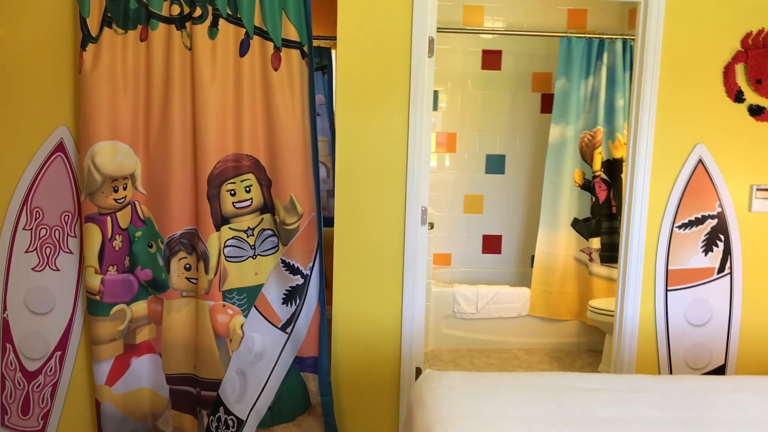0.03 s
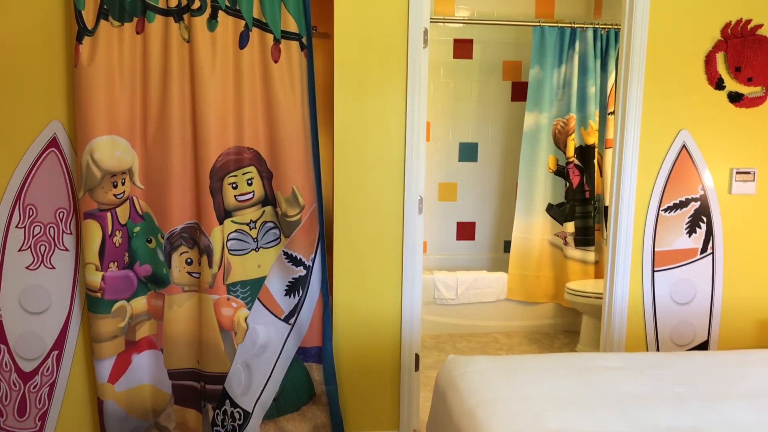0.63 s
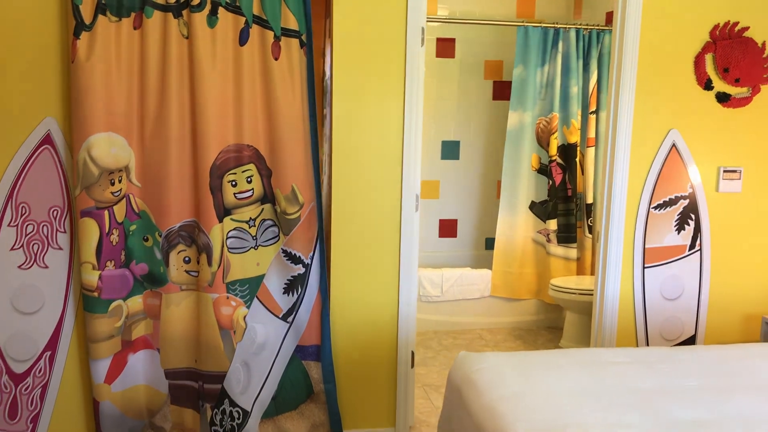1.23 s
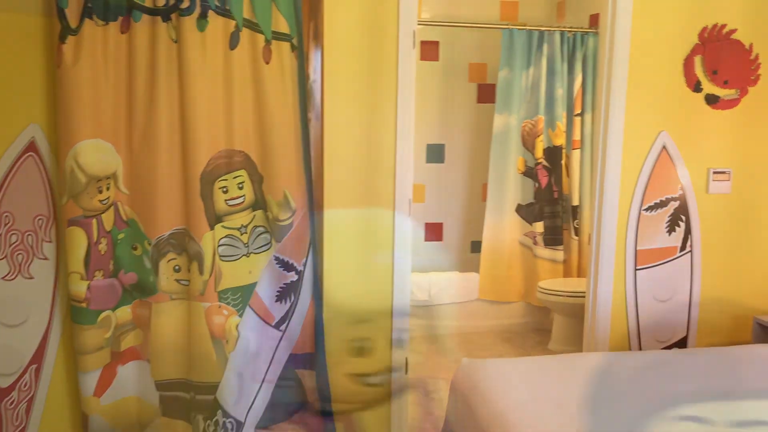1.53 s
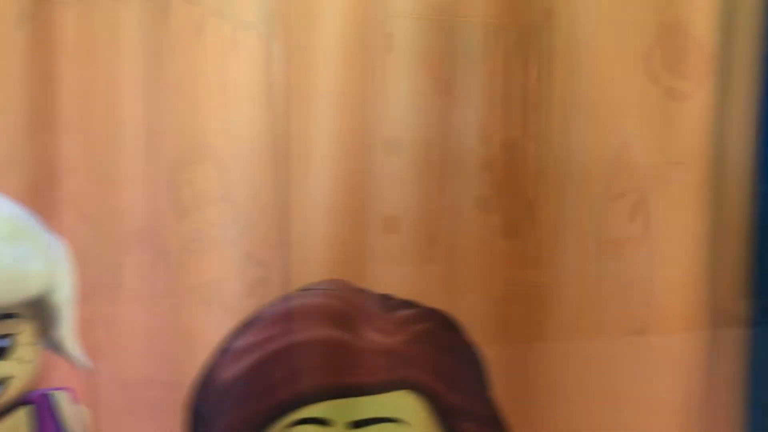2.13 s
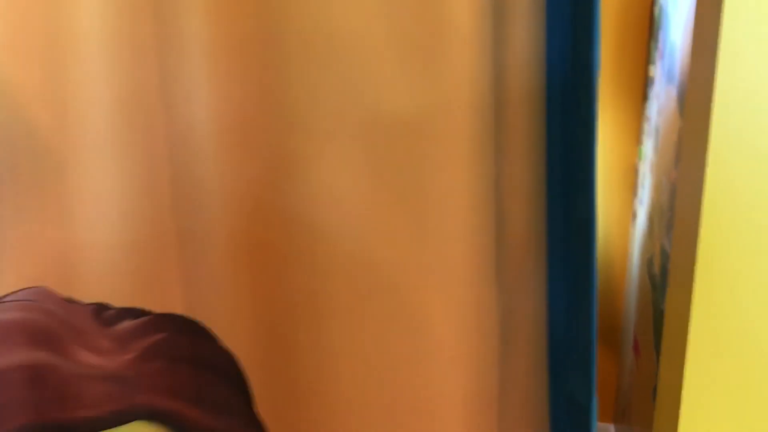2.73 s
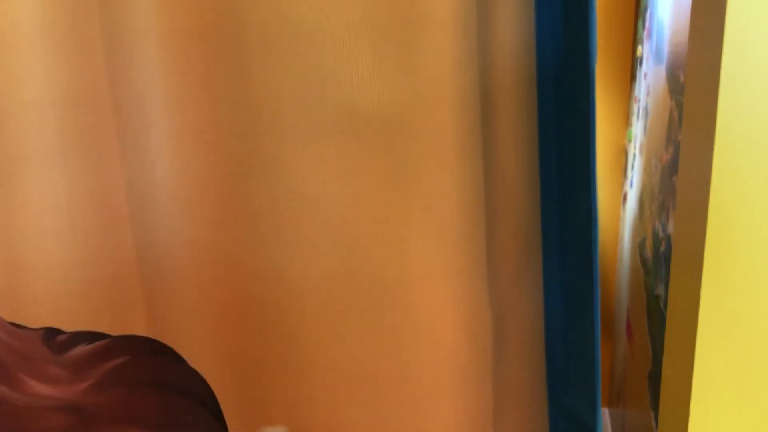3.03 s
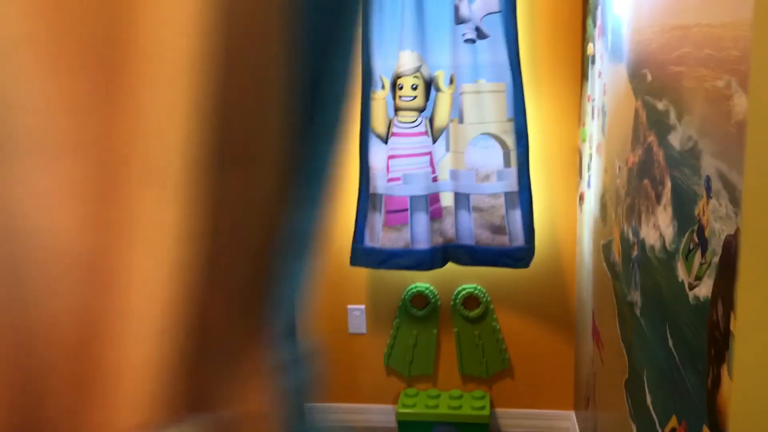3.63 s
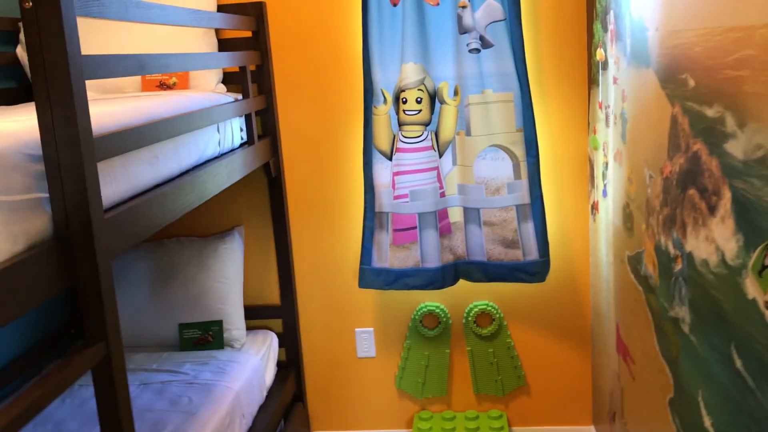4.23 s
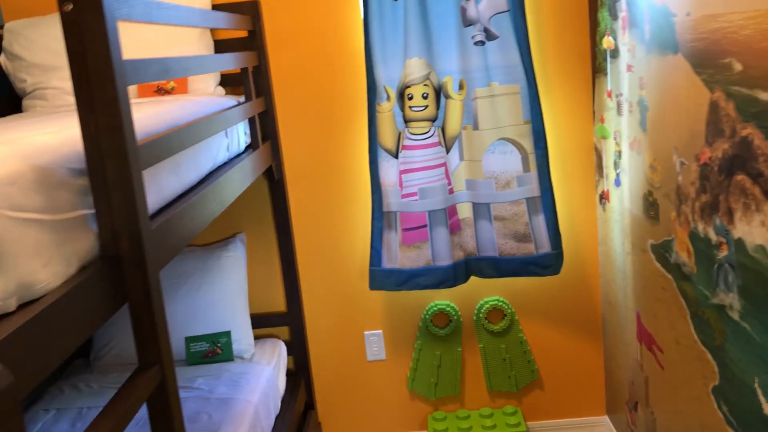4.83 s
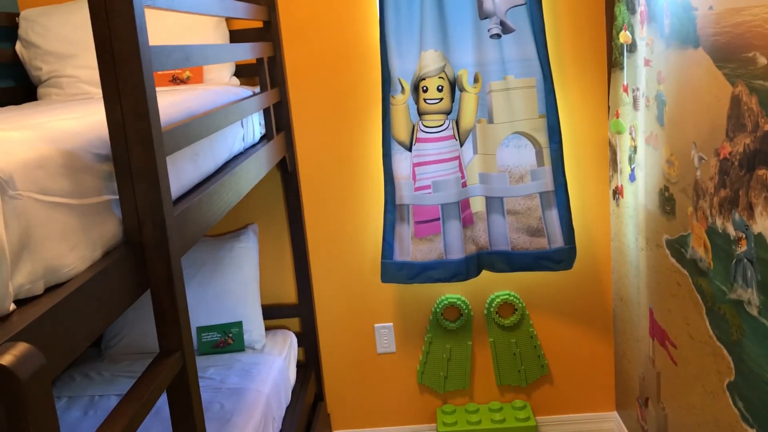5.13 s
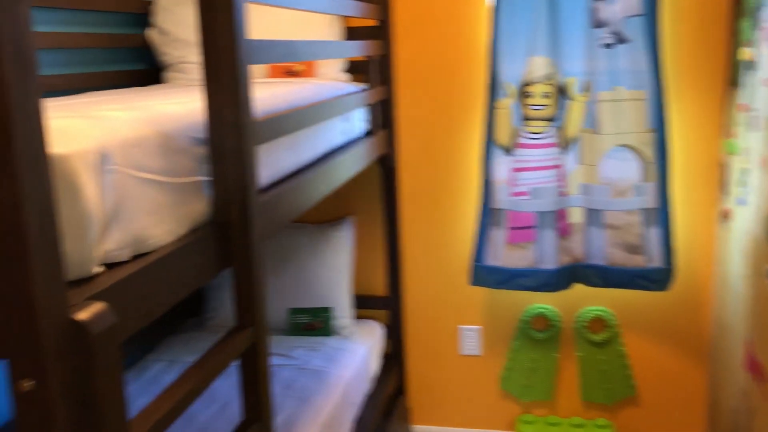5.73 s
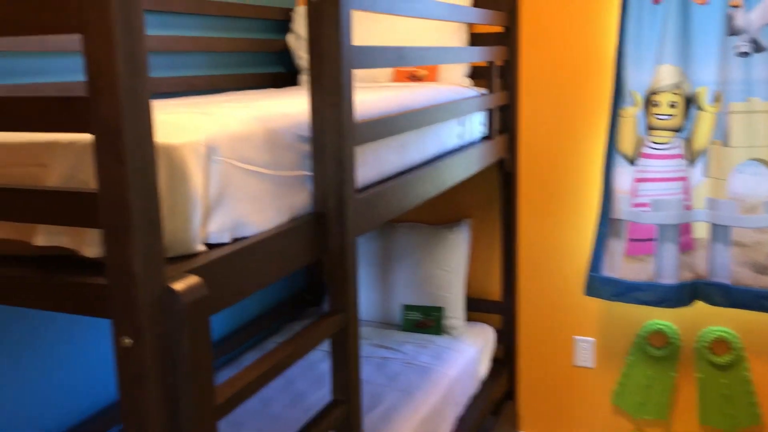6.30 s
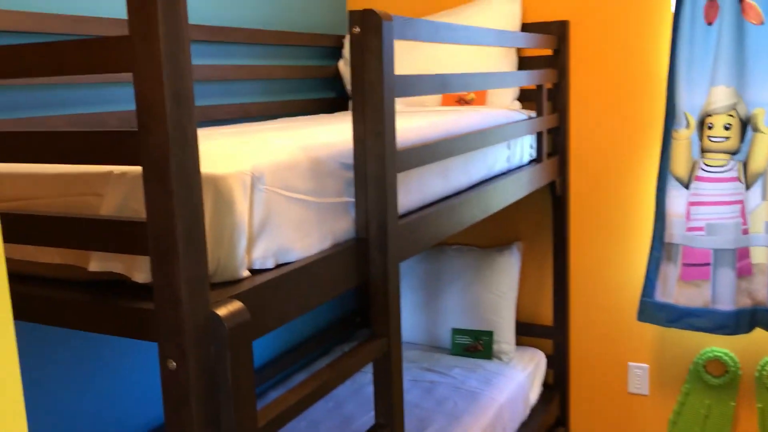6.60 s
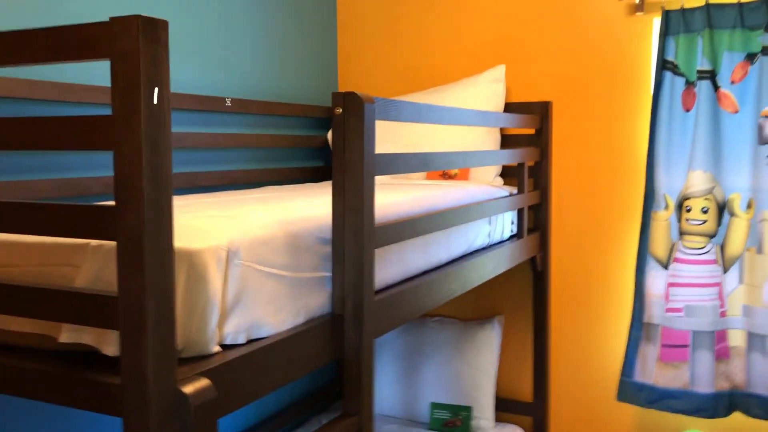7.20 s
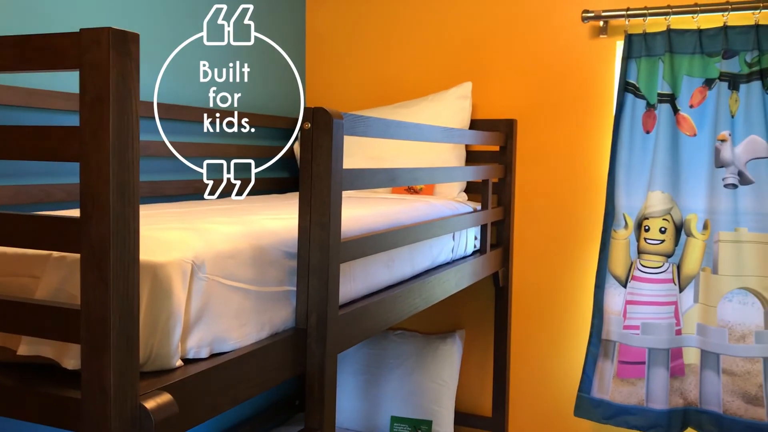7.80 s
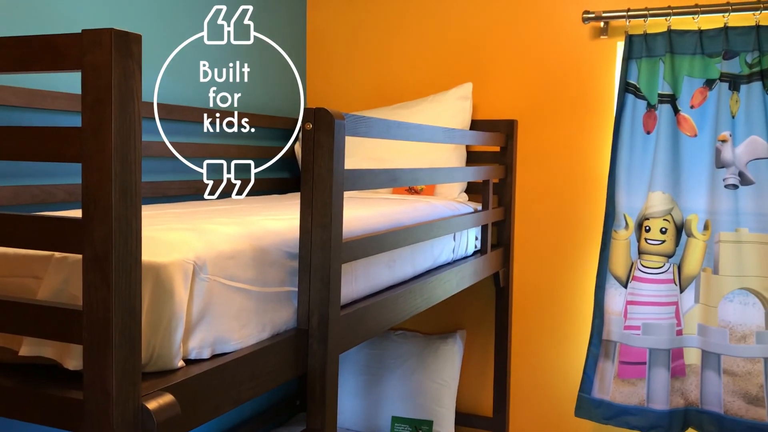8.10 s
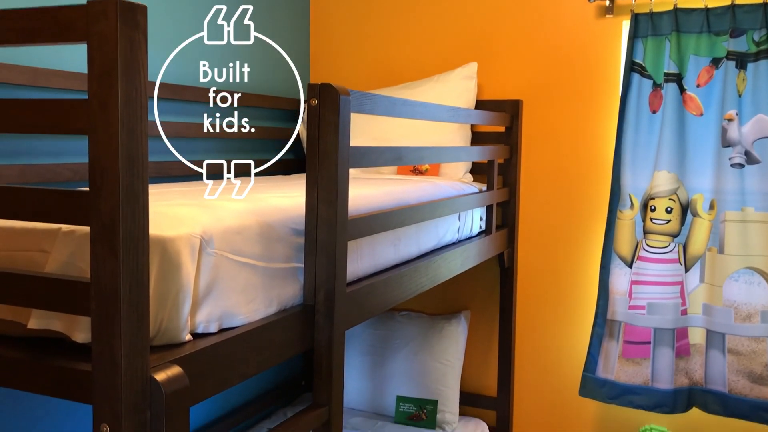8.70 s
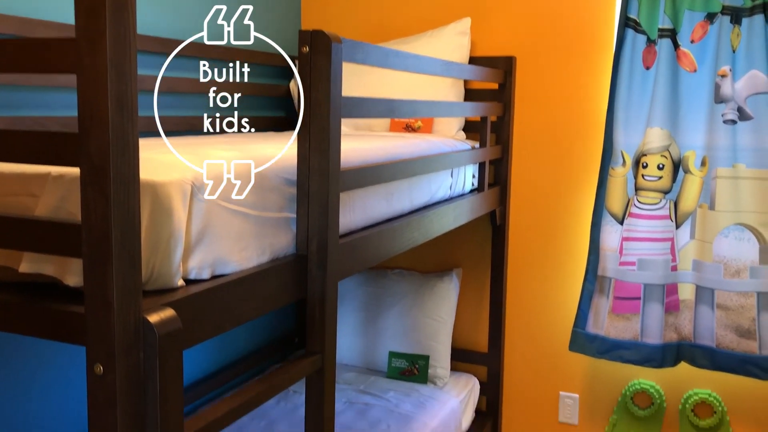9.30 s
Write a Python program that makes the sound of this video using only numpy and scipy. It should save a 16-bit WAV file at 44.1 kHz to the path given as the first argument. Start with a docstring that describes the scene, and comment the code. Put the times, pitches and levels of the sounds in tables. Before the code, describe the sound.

Curtain cloth rustles and rings clatter along a hollow metal rod after a rushing air conditioner suddenly drops to a faint hum.

```python
"""An air conditioner rushes and hums in a hotel room; at first it is heard loud, then the background abruptly
drops far lower. A hand brushes and grips a curtain: threads slip, folds snap, the cloth flaps taut. As it is
pulled aside, its rings knock and scrape on a hollow metal rod, exciting the rod's modes, and bunch up with a
bright jingle. Two rings drop into place and ring on while the cloth settles."""
import sys
import numpy as np
from scipy import signal
from scipy.fft import rfft, irfft, next_fast_len
from scipy.io import wavfile

SR = 44100
rng = np.random.default_rng(int(sys.argv[2]) if len(sys.argv) > 2 else 0)


def log_audio(samples):
    """Write samples as a 16-bit WAV file to the path given in sys.argv[1]."""
    # one column per channel
    frames = np.atleast_2d(samples).T
    # limit to full scale, then quantise
    limited = np.clip(frames, -1, 1)
    pcm = np.round(limited * 32767).astype(np.int16)
    wavfile.write(sys.argv[1], SR, pcm)


N = 412335
TIME = np.arange(N) / SR
TAIL = np.arange(SR // 2) / SR   # Time axis of one event, half a second long.
ROOM_T60_S = 0.48
BUNCH_START_S, BUNCH_END_S = 4.48, 5.115   # rings crowd together
DAMP_START_S = 4.97   # gathered cloth starts to damp the rod
ROD_SPREAD = 0.0024   # relative pitch scatter between contacts

# spectra of near rubs and of hand swishes: (frequency [Hz], density [dB])
RUB_SPECTRUM = [(150, -5), (400, -9), (1000, 0), (1800, -1.5), (3500, -3.5), (5500, -6.5), (9000, -10.5),
                (15000, -16.5)]
SWISH_SPECTRUM = [(300, 7.5), (1100, 2), (1550, 4.5), (2100, 0.5), (3300, 3), (4600, -4.5), (8000, -4),
                  (13000, -5), (15500, -9)]
# dense resonances, ring on rod and ring on ring: (frequency [Hz], density [dB])
CLATTER_SPECTRUM = [(100, -16), (280, -6), (450, -14), (750, -4.5), (1100, 0), (2200, -1), (2700, -2),
                    (3300, -10), (4000, -8.5), (6000, -6.5), (9000, -9), (12000, -16), (15500, -16.5)]
JINGLE_SPECTRUM = [(2000, -25), (4000, -9), (6000, -7), (8000, -10.5), (10500, -7), (11700, 2.5),
                   (13000, -5), (15500, -20)]
# mode clusters, rod with rings and whole rod flexing: (frequency [Hz], half width [Hz], level [dB])
ROD_MODES = [(290, 14, -5), (897, 29, -8), (1192, 8.1, 2), (1272, 26, -7.5), (1420, 14, -10),
             (1560, 16, -9.5), (1652, 9.4, -1), (1920, 7, 0.5), (2070, 30, -4), (2174, 11, 6),
             (2240, 28, -3), (2525, 8.3, -5), (2877, 35, -3), (3730, 48, -10.5), (4160, 85, -12),
             (4540, 40, -8), (5180, 46, -8), (5550, 35, -8), (6030, 110, -9.5), (7200, 35, -5.5),
             (8100, 35, -10), (8770, 100, -8), (11680, 55, -11)]
BEND_MODES = [(183, 3.6, -10), (229.7, 5, -7), (263.5, 4.1, -1), (294, 3.8, 1)]
# rings knocking on the rod: (time [s], level [dB], tilt [dB/octave], peak [Hz])
KNOCKS = [(3.629, -52, -2, 1600), (3.851, -41, -3.5, 1480), (4.038, -37, 0, 1710), (4.044, -31, 3.5, 1660),
          (4.121, -40, -8, 1940), (4.147, -33, 0.5, 1580), (4.182, -36, 0, 1400), (4.211, -39, 1, 1900),
          (4.2474, -33, -2, 1700), (4.318, -31.5, 2.5, 1520), (4.372, -39, -5, 1720),
          (4.439, -41, -7, 1370), (4.521, -39, -7, 2400), (4.554, -36, -2, 1680), (4.605, -34.5, 0, 2000),
          (4.62, -35.5, 10, 5100), (4.648, -36.5, 7, 2200), (4.7003, -26.5, 7, 2170),
          (4.7413, -28.5, 7, 2200), (4.89, -36, 9, 8800), (4.942, -32.5, 0, 4960), (5.0004, -43, 3, 11600),
          (5.056, -34, 2.5, 2920), (5.063, -29.5, 0, 2900)]


def from_db(db):
    """Decibels to gain."""
    return 10 ** (np.asarray(db) / 20)


def rms_one(x):
    """Scale to rms 1."""
    return x / np.sqrt(np.mean(x ** 2) + 1e-20)


def add(out, start_s, sound):
    """Mix a sound in at start_s."""
    at = int(start_s * SR)
    out[at:at + len(sound)] += sound[:N - at]


def level(times_s, db, fade_s=0.015):
    """Gain along a dB curve, silent outside it."""
    return from_db(np.interp(TIME, [times_s[0] - fade_s, *times_s, times_s[-1] + fade_s],
                             [-120, *db, -120]))


def decay(t60_s):
    """Envelope falling 60 dB in t60_s."""
    return np.exp(-np.log(1000) * TAIL / t60_s)


def bell(middle_s, length_s):
    """Gaussian swell, about 9 dB down at both ends."""
    return np.exp(-(2 * (TIME - middle_s) / length_s) ** 2)


def drift(rate_hz):
    """Slow random wander; rms 1."""
    knots = rng.standard_normal(int(N / SR * 400))
    return rms_one(np.interp(TIME * rate_hz, np.arange(len(knots)), knots))


def grains(per_s, spread_db):
    """Tiny slips of random time and size; rms 1."""
    sizes = from_db(spread_db * np.minimum(rng.exponential(1, N), 4)) * rng.choice([-1, 1], N)
    return rms_one(sizes * (rng.random(N) < per_s / SR))


def noise(samples=len(TAIL)):
    """White noise, one event long by default."""
    return rng.standard_normal(samples)


def filtered(x, gain_at):
    """Weight each frequency; rms 1."""
    size = next_fast_len(len(x))
    hz = np.maximum(np.fft.rfftfreq(size, 1 / SR), 1)
    return rms_one(irfft(rfft(x, size) * gain_at(hz), size)[:len(x)])


def coloured(x, spectrum):
    """Apply a spectrum; rms 1."""
    points_hz, db = np.transpose(spectrum)
    return filtered(x, lambda hz: from_db(np.interp(np.log(hz), np.log(points_hz), db)))


def resonant(x, modes):
    """Apply resonances; rms 1."""
    centre, width, db = np.transpose(modes)[:, :, None]
    return filtered(x, lambda hz: np.sum(from_db(db) / (1 + ((hz - centre) / width) ** 2), axis=0))


def butterworth(x, order, hz, kind):
    """Low-pass or high-pass."""
    return signal.sosfilt(signal.butter(order, hz, kind, fs=SR, output="sos"), x)


def detuned(modes, spread):
    """Scatter mode pitches for one contact."""
    return [(hz * (1 + spread * rng.uniform(-1, 1)), width, db) for hz, width, db in modes]


def ringing(modes, t60_s):
    """Mode clusters ring out with random strengths; rms 1."""
    return rms_one(resonant(noise(), modes) * decay(t60_s))


def crack(spectrum, t60_s, room_db):
    """Dense resonances die away over a room tail; rms 1."""
    return rms_one(coloured(noise(), spectrum) * (decay(t60_s) + from_db(room_db) * decay(ROOM_T60_S)))


def excite(force, response):
    """Convolve a force with a response scaled to unit energy."""
    return signal.fftconvolve(force, response / np.linalg.norm(response))[:N]


def contact(x, tilt_db, peak_hz, boost_db, knee_hz=2500, q=5.9):
    """Contact hardness sets the treble, its place favours one band; rms 1 over the first 20 ms."""
    dull = signal.lfilter(*signal.butter(1, knee_hz, fs=SR), x)
    x = dull + from_db(2 * tilt_db) * (x - dull)   # treble: about two octaves above the knee
    x = x + (from_db(boost_db) - 1) * signal.lfilter(*signal.iirpeak(peak_hz, q, fs=SR), x)
    return x / np.std(x[:SR // 50])


def damping(time_s):
    """Gain of the rod's flexing as gathered cloth damps it."""
    return from_db(np.interp(time_s, [DAMP_START_S, BUNCH_END_S], [0, -12]))


def air_conditioner(hush_s=1.754, fade_s=0.0066, air_loud_db=-36.5, air_quiet_db=-56):
    """Rushing air, motor hum and duct resonances; heard loud until hush_s, then far lower."""
    # air rush, loud and quiet: (frequency [Hz], density [dB])
    air_loud = [(20, -39), (32, -12), (50, -12), (72, -6), (90, -4.5), (140, -11), (190, -3), (300, -8),
                (455, -12.5), (520, -9), (750, -14), (1500, -16.5), (2200, -24), (7000, -36.5),
                (15500, -40.5)]
    air_quiet = [(20, -46), (32, -23), (48, -3.5), (75, -9.5), (140, -7.5), (190, -10.5), (330, -18),
                 (520, -20.5), (900, -26), (1400, -25), (2100, -34), (4800, -45), (9000, -48.5),
                 (15500, -50)]
    # motor and fan tones: (frequency [Hz], loud [dB], quiet [dB], unsteadiness [0-1])
    hum = [(47.6, -45.5, -73.5, 0.5), (59.9, -39, -78, 0.18), (98.8, -52, -63.5, 0.38),
           (120, -36, -58.5, 0.02), (340, -56.5, -80, 0.46), (432.3, -59, -74.5, 0.3), (655, -65, -79, 0.4)]
    # duct resonances: (frequency [Hz], half width [Hz], loud [dB], quiet [dB])
    duct = [(264.4, 15, -46.5, -76.5), (347, 33, -47.5, -70), (587, 49, -49, -72.5), (641, 46, -59.5, -76),
            (991, 105, -52, -71.5), (1480, 17, -53.5, -83)]
    loud = np.clip((hush_s - TIME) / fade_s, 0, 1)
    out = loud * from_db(air_loud_db) * coloured(noise(N), air_loud)
    out += (1 - loud) * from_db(air_quiet_db) * coloured(noise(N), air_quiet)
    for hz, loud_db, quiet_db, unsteady in hum:
        phase = 2 * np.pi * (hz * TIME + rng.random())
        tone = (1 + unsteady * drift(7)) * np.sin(phase) + unsteady * drift(6.4) * np.cos(phase)
        out += from_db(quiet_db + loud * (loud_db - quiet_db)) * rms_one(tone)
    for hz, width_hz, loud_db, quiet_db in duct:
        out += from_db(quiet_db + loud * (loud_db - quiet_db)) * resonant(noise(N), [(hz, width_hz, 0)])
    return out


def last_sway(middle_s=7.62, length_s=0.16, db=-74):
    """One last soft brush of the hanging cloth."""
    # brush: (frequency [Hz], density [dB])
    spectrum = [(1000, -20), (2500, -5), (3400, 1), (4500, -8), (7000, -8), (15000, -20)]
    return from_db(db) * bell(middle_s, length_s) * coloured(grains(9000, 2.5), spectrum)


def cloth(flutter_db=1.87):
    """Threads slip over each other: soft rubs, duller from afar, and swishes that stop short."""
    # swelling rubs: (middle [s], length [s], level [dB], nearness [0-1])
    rubs = [(0.233, 0.12, -44, 0.16), (0.724, 0.36, -48, 0.87), (1.229, 0.12, -38, 0.08),
            (1.584, 0.094, -35.5, 0.1), (1.693, 0.05, -39, 0.3), (2.385, 0.26, -59, 0),
            (2.625, 0.39, -61.5, 0.2), (3.28, 0.38, -64, 0.9), (3.678, 0.24, -58, 0.55),
            (3.982, 0.36, -47.5, 0.87), (5.377, 0.37, -52, 0.7), (6.3, 0.79, -59, 1),
            (7.093, 0.75, -68, 0.47)]
    # distant rub: (frequency [Hz], density [dB])
    far_spectrum = [(150, 10), (500, 4), (1200, 7), (2500, 2), (4000, -6), (7000, -13.5), (15000, -32)]
    # quick hand strokes: (start [s], length [s], level [dB])
    swishes = [(2.47, 0.096, -69), (2.638, 0.07, -57), (2.779, 0.046, -53), (3.39, 0.15, -52.5),
               (3.574, 0.05, -53), (3.904, 0.024, -47), (3.966, 0.037, -50), (5.393, 0.13, -52)]
    far_power, near_power, stroke = np.zeros((3, N))
    for middle_s, length_s, db, nearness in rubs:
        power = (from_db(db) * bell(middle_s, length_s * np.sqrt(2))) ** 2
        far_power += power * (1 - nearness)
        near_power += power * nearness
    for start_s, length_s, db in swishes:
        stroke += from_db(db) * np.interp((TIME - start_s) / length_s, [0, .3, .8, 1], [.018, .98, 1, 0])
    rub = np.sqrt(far_power) * coloured(grains(9000, 2.8), far_spectrum)
    rub += np.sqrt(near_power) * coloured(grains(9000, 2.2), RUB_SPECTRUM)
    rub *= from_db(flutter_db * drift(45))
    return rub + stroke * coloured(grains(8000, 2.7), SWISH_SPECTRUM)


def scuffs(slips_per_s=900):
    """Coarse slips ring a brief resonance that may glide upward; a narrow one squeaks."""
    # cloth and rings catching:
    # (middle [s], length [s], level [dB], pitch [Hz], half width [Hz], rise [octaves/s])
    catches = [(1.243, .05, -48, 2300, 110, 1.55), (1.558, 0.065, -42, 1880, 110, 1.4),
               (1.59, 0.033, -44, 1240, 110, 1.4), (2.812, 0.013, -49.5, 1555, 60, 1.6),
               (3.07, .05, -70.5, 3300, 60, 0.034), (3.273, 0.035, -59, 3250, 80, 0.21),
               (3.332, .1, -65, 3300, 70, 0), (6.462, .09, -60, 2100, 500, 0),
               (6.565, .05, -62, 1390, 250, 0)]
    out = np.zeros(N)
    offset_s = TAIL - TAIL.mean()
    for middle_s, length_s, db, hz, width_hz, rise in catches:
        slips = noise() * (rng.random(len(TAIL)) < slips_per_s / SR)
        glide = np.cumsum(2 ** (rise * offset_s))
        scuff = np.interp(glide, np.arange(len(TAIL)), resonant(slips, [(hz, width_hz, 0)]))
        add(out, middle_s - TAIL.mean(), from_db(db) * scuff * np.exp(-(2 * offset_s / length_s) ** 2))
    return out


def tick(time_s=2.7168, level_db=-29, crack_db=-14):
    """One dry, woody tick: heavily damped modes struck through a soft contact, plus a faint crack."""
    # tick modes: (frequency [Hz], level [dB], t60 [s])
    modes = [(550, 0, 0.014), (1060, -1.5, 0.0083), (1450, -1, 0.011), (2070, -2, 0.0068),
             (2720, -1.5, 0.0055), (3300, -2, 0.0044)]
    knock = sum((-1) ** k * from_db(db) * np.sin(2 * np.pi * hz * TAIL) * decay(t60_s)
                for k, (hz, db, t60_s) in enumerate(modes))
    knock = butterworth(knock, 6, 3600, "low")
    knock += from_db(crack_db) * coloured(noise(), RUB_SPECTRUM) * decay(0.008)
    out = np.zeros(N)
    add(out, time_s, from_db(level_db) * butterworth(knock, 2, 240, "high"))
    return out


def folds(rise_cycles=0.3, body_ratio=0.69, body_db=-18, crinkle_db=-19, flap_s=0.078, tug_db=-15):
    """Buckling folds give dry pulses over a lower body; the sheet flaps when gripped or tugged."""
    # folds snapping: (time [s], level [dB], pitch [Hz])
    snaps = [(2.656, -37, 1990), (2.6925, -36.5, 6000), (3.358, -45, 2000), (3.3886, -35.5, 2400),
             (3.433, -38.5, 2800), (3.473, -36, 3000), (3.611, -39, 1700), (3.632, -33, 1400),
             (3.657, -42, 1500), (3.7706, -25, 1890), (3.79, -35, 1300), (3.81, -37, 1400),
             (3.8154, -30, 7000), (3.858, -25.5, 2010), (3.881, -25, 4000), (3.9105, -22.5, 3400),
             (5.5738, -32.5, 2400)]
    # gripped cloth coming taut: (time [s], level [dB])
    flaps = [(3.80, -46), (3.855, -39.5)]
    # flap: (frequency [Hz], density [dB])
    flap_spectrum = [(25, -17), (55, -1), (130, -6), (200, 0), (270, 4.5), (380, -17.5), (600, -33),
                     (1500, -30), (5000, -57)]
    out = np.zeros(N)
    for time_s, db, hz in snaps:
        cycles = np.outer([hz, hz * body_ratio], TAIL)
        pulse, body = np.sin(2 * np.pi * cycles) * cycles / rise_cycles * np.exp(1 - cycles / rise_cycles)
        crinkle = crack(SWISH_SPECTRUM, t60_s=0.015, room_db=-35)
        crinkle /= np.abs(crinkle).max()
        add(out, time_s, from_db(db) * (pulse + from_db(body_db) * body + from_db(crinkle_db) * crinkle))
    # a catching ring tugs the cloth
    tugs = [(time_s, db + tug_db) for time_s, db, *_ in KNOCKS if time_s < DAMP_START_S]
    swell = TAIL / (flap_s / 3)
    for time_s, db in [*flaps, *tugs]:
        add(out, time_s, from_db(db) * swell * np.exp(1 - swell) * coloured(noise(), flap_spectrum))
    return out


def chiming_rings(attack_s=0.0066):
    """Grazing touches build up a chime in free-hanging rings."""
    # light touches: (time [s], level [dB], peak [Hz], peak boost [dB])
    touches = [(1.996, -71, 7000, 11), (3.133, -55, 12100, -2), (3.221, -56.5, 9300, 19)]
    # hanging ring: (frequency [Hz], half width [Hz], level [dB])
    modes = [(3306, 45, -13), (5500, 250, -12), (6970, 200, -10), (9370, 140, -7), (11800, 230, -17),
             (12500, 180, -16)]
    out = np.zeros(N)
    for time_s, db, peak_hz, boost_db in touches:
        chime = crack(JINGLE_SPECTRUM, t60_s=0.24, room_db=-6)
        chime += from_db(-3) * ringing(detuned(modes, spread=0.008), t60_s=0.3)
        chime *= 1 - np.exp(-TAIL / attack_s)
        add(out, time_s, from_db(db) * contact(chime, 0, peak_hz, boost_db))
    return out


def dropping_rings(attack_s=0.0015, flex_hz=293, flex_t60_s=0.57, clack_db=-4.5, click_db=-9.5):
    """Freed rings fall onto the rod: hard click, short clack, clear ring modes, low rod note."""
    # drops: (time [s], level [dB], tilt [dB/octave], t60 scale [0-1], rod flexing [dB])
    drops = [(6.2513, -38.5, 0.5, 1, -9.5), (6.783, -46.5, -3, 0.52, -24)]
    # freely swinging ring: (frequency [Hz], level [dB], t60 [s])
    modes = [(1335, -9.5, .22), (1400, -8, .26), (1549, -5, 0.19), (1670, -6, .22), (1960, -5.5, 0.21),
             (2208, -6, .17), (2270, 1, 0.19), (2590, -13, .22), (2970, -19, 0.32), (3830, -27, 0.49),
             (5500, -22, .33), (7150, -18, .55), (7200, -21, .6), (11510, -25, .4)]
    # hard first touch: (frequency [Hz], density [dB])
    click_spectrum = [(800, -28), (1500, 2), (4500, -1), (6500, 0), (9000, -11), (15000, -20)]
    out = np.zeros(N)
    for time_s, db, tilt_db, t60_scale, flex_db in drops:
        tones = np.zeros(len(TAIL))
        for hz, mode_db, t60_s in modes:
            gain = from_db(mode_db + rng.normal(0, 1.5))
            tones += gain * np.sin(2 * np.pi * (hz * TAIL + rng.random())) * decay(t60_s * t60_scale)
        tones *= 1 - np.exp(-TAIL / attack_s)
        flex = from_db(flex_db) * np.sin(2 * np.pi * flex_hz * TAIL) * decay(flex_t60_s)
        clack = crack(CLATTER_SPECTRUM, t60_s=0.098, room_db=-5)
        clack = contact(clack, tilt_db - 5, peak_hz=1560, boost_db=6)
        clack = from_db(clack_db) * butterworth(clack, 4, 1100, "high")
        click = from_db(click_db) * coloured(noise(), click_spectrum) * decay(0.03)
        add(out, time_s, from_db(db) * (tones + flex + clack + click))
    return out


def knocking_rings(rattle_s=0.009, rattle_per_s=1200, rattle_gain=0.62, bend_db=-11.5):
    """A ring catches, tips over, rattles briefly on the rod and sets it flexing."""
    out = np.zeros(N)
    for time_s, db, tilt_db, peak_hz in KNOCKS:
        rod = crack(CLATTER_SPECTRUM, t60_s=0.026, room_db=-10.5)
        rod += from_db(-2) * ringing(detuned(ROD_MODES, ROD_SPREAD), t60_s=0.2)
        rattle = noise() * (rng.random(len(TAIL)) < rattle_per_s / SR)
        rattle *= rattle_gain * np.exp(-TAIL / rattle_s)
        rattle[0] = 1   # hard first touch
        knock = contact(signal.fftconvolve(rattle, rod)[:len(TAIL)], tilt_db, peak_hz, boost_db=8.5)
        flex = ringing(BEND_MODES, t60_s=0.22)
        flex_gain = from_db(bend_db - 0.55 * tilt_db) * damping(time_s)   # dull knocks flex it more
        add(out, time_s, from_db(db) * (knock + flex_gain * flex / np.abs(flex).max()))
    return out


def sliding_rings(jerk_db=0.9, turn_s=0.045, mid_rod_s=4.68, bend_end_db=-14.5, bend_mid_db=-5.5):
    """Rings stick and slip along the rod, flex it most at mid-span and jingle more as they bunch."""
    # pull speed as scrape level: (time [s], level [dB])
    pull = [(4.04, -47.5), (4.25, -45), (4.52, -40), (4.58, -33.8), (4.77, -35), (4.87, -39.5),
            (4.93, -36.5), (5.07, -40), (5.125, -46.5)]
    # ring against ring: (frequency [Hz], half width [Hz], level [dB])
    jingle_modes = [(2900, 42, 1), (4090, 130, -1.5), (5640, 170, -7.5), (11180, 90, -2.5),
                    (11480, 73, -0.5), (11820, 76, -2), (12400, 270, -18)]
    scrape = level(*np.transpose(pull)) * from_db(jerk_db * drift(45))   # all rings jerk together
    slips = scrape * grains(per_s=2500, spread_db=2.2)
    jingle = from_db(np.interp(TIME, [BUNCH_START_S, BUNCH_END_S], [-13.5, 7]))
    bend = damping(TIME) * from_db(bend_end_db + (bend_mid_db - bend_end_db) * bell(mid_rod_s, 0.32))
    out = excite(slips * bend, ringing(BEND_MODES, t60_s=0.31))
    # rings take turns bearing on the rod, each with its own modes
    hop = int(turn_s * SR)
    load = np.sin(np.linspace(0, np.pi, 2 * hop))
    for turn in range(int(pull[0][0] / turn_s) - 1, int(pull[-1][0] / turn_s) + 1):
        span = slice(turn * hop, (turn + 2) * hop)
        rod = crack(CLATTER_SPECTRUM, t60_s=0.021, room_db=-12)
        rod += from_db(-2) * ringing(detuned(ROD_MODES, ROD_SPREAD), t60_s=0.27)
        neighbours = crack(JINGLE_SPECTRUM, t60_s=0.025, room_db=-24)
        neighbours += from_db(1.5) * ringing(detuned(jingle_modes, spread=0.012), t60_s=0.25)
        force = load * slips[span]
        add(out, turn * hop / SR, excite(force, rod) + excite(force * jingle[span], neighbours))
    return out


def scene():
    """Curtain, air conditioner and rings in mono."""
    curtain = cloth() + scuffs() + last_sway() + folds() + tick()
    background = air_conditioner()
    rings = sliding_rings() + knocking_rings() + chiming_rings() + dropping_rings()
    return (background + curtain + rings)[None]


def record(dry, notch_hz=10400, notch_q=9, notch_share=0.37, cutoff_hz=15850):
    """Microphone with a treble dip and a steep top cut."""
    dipped = signal.lfilter(*signal.iirnotch(notch_hz, notch_q, fs=SR), dry)
    heard = dry + notch_share * (dipped - dry)
    return signal.sosfilt(signal.ellip(12, 0.1, 80, cutoff_hz, fs=SR, output="sos"), heard)


dry = scene()
out = record(dry)
log_audio(out)
```